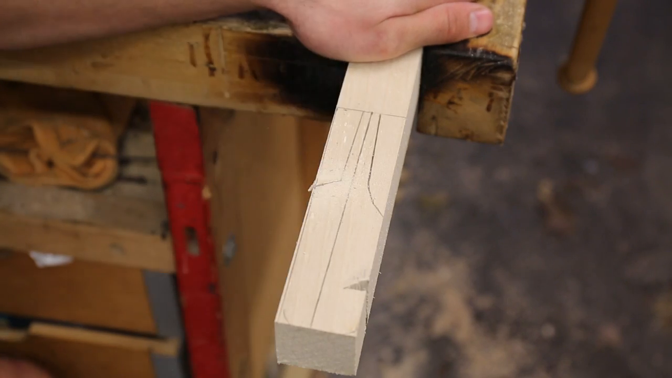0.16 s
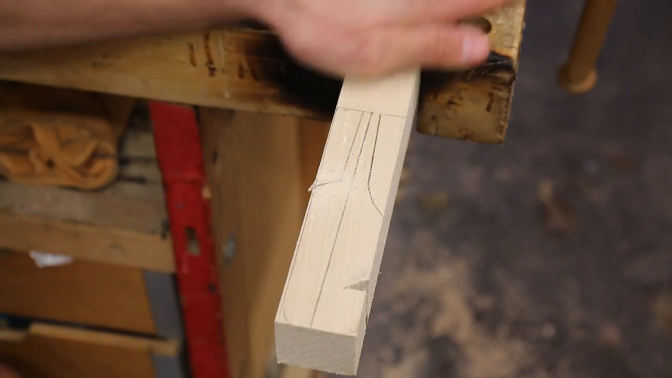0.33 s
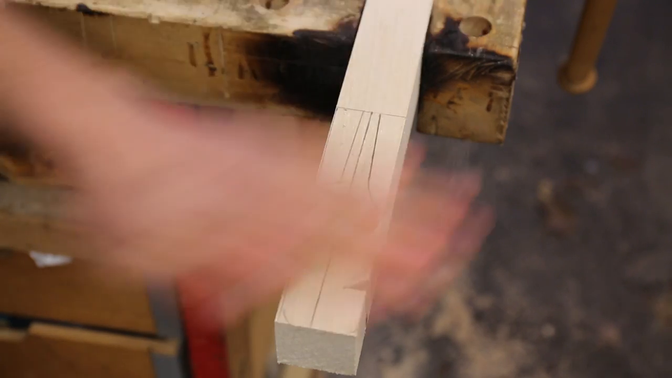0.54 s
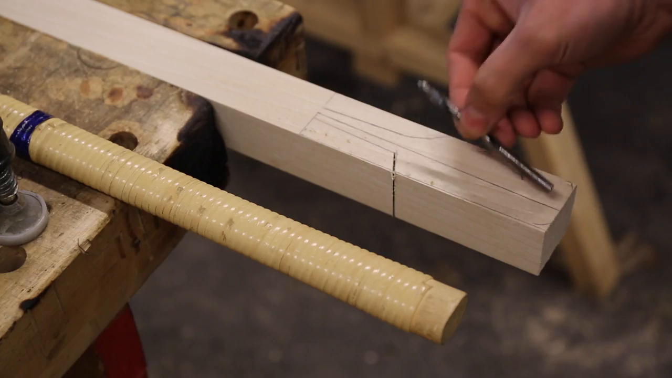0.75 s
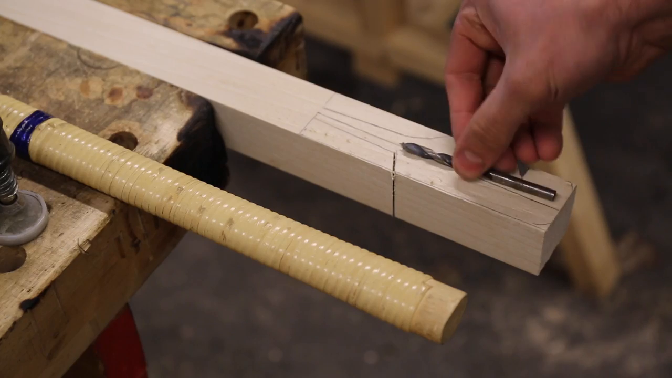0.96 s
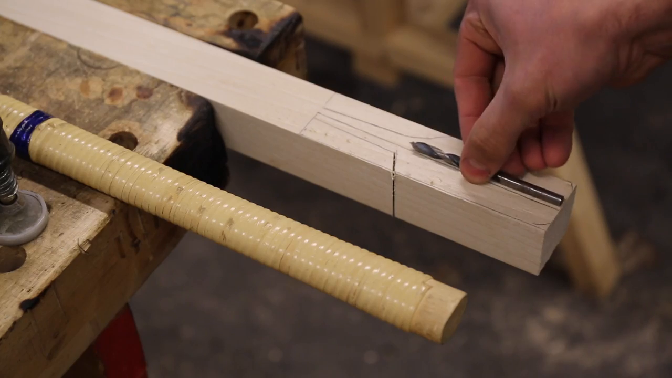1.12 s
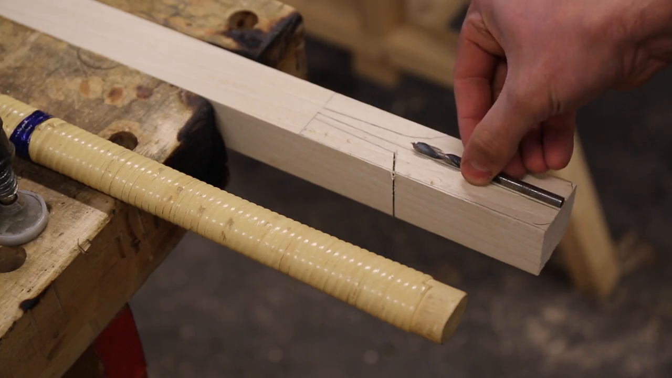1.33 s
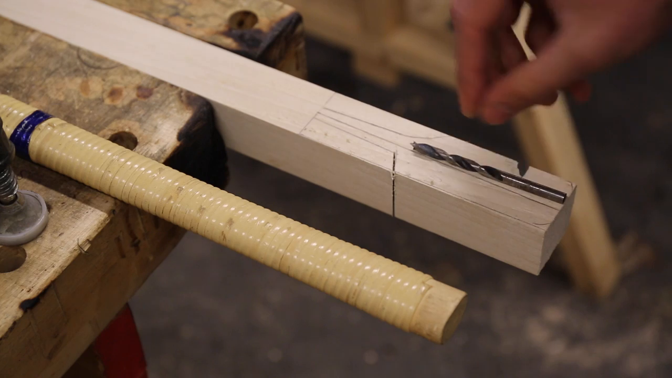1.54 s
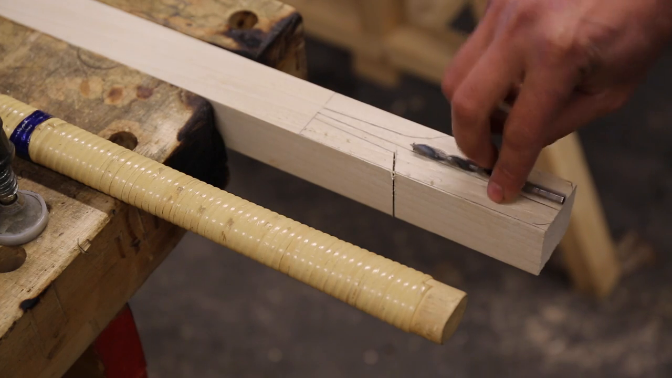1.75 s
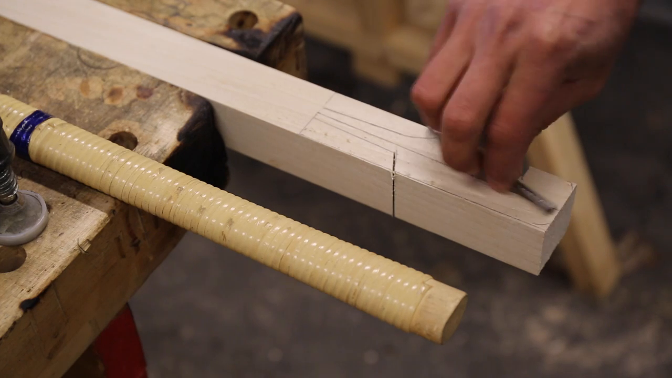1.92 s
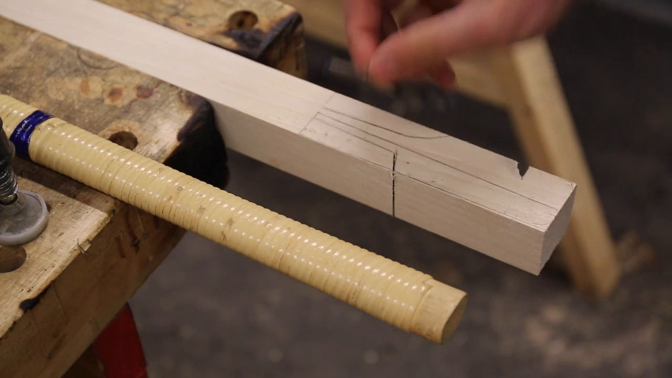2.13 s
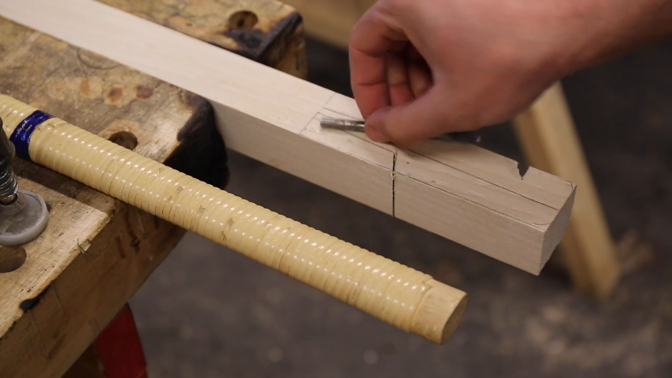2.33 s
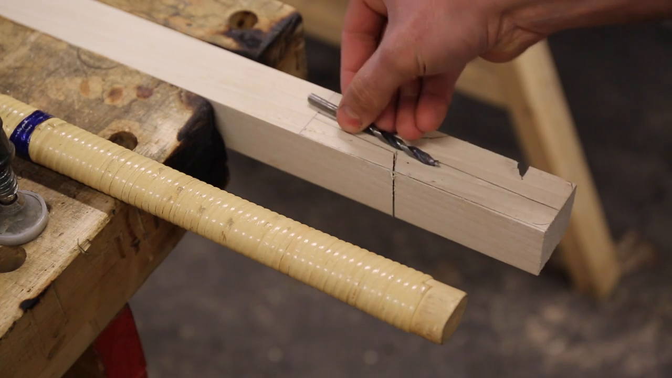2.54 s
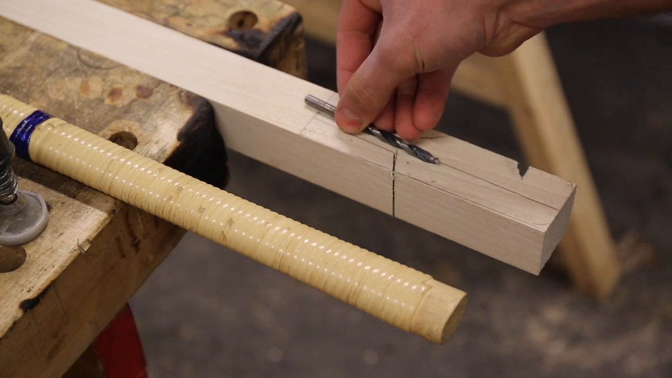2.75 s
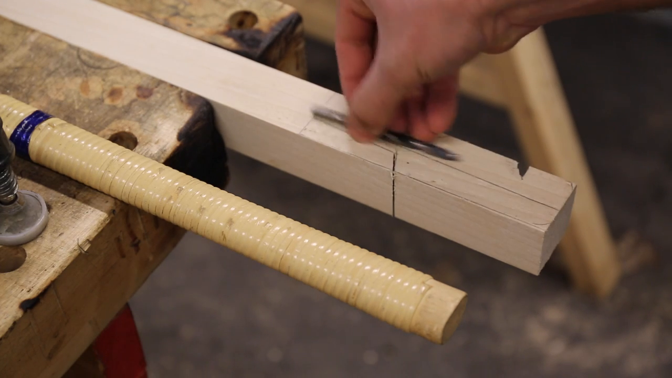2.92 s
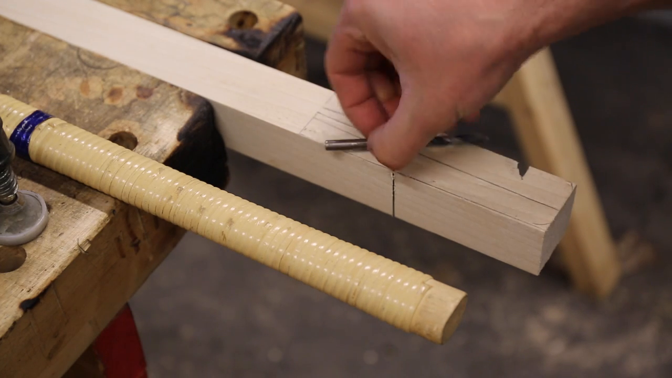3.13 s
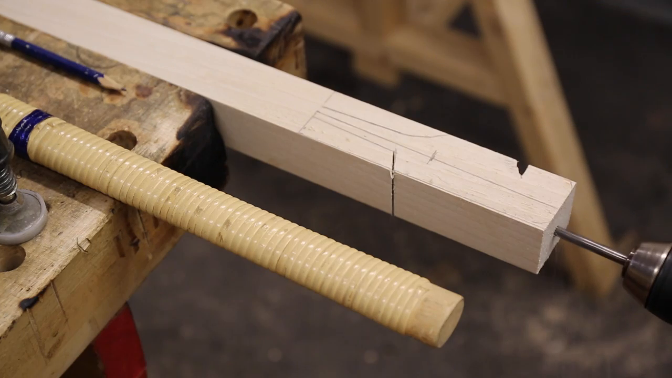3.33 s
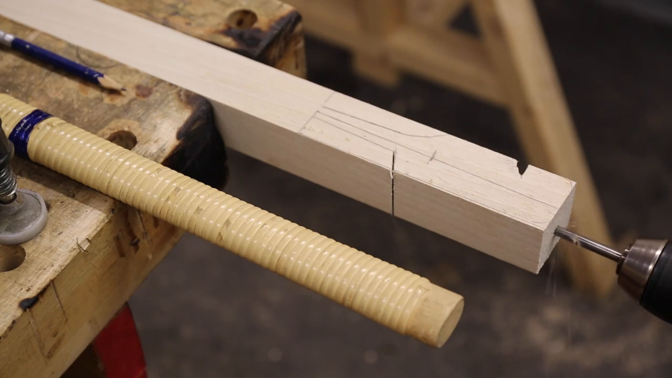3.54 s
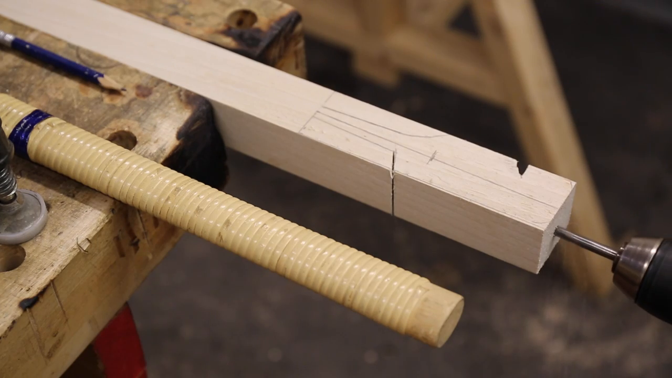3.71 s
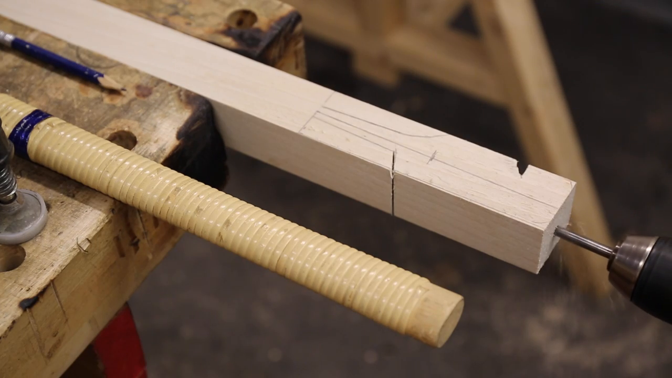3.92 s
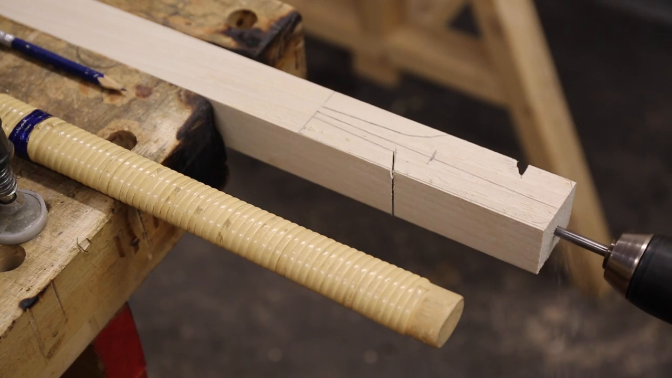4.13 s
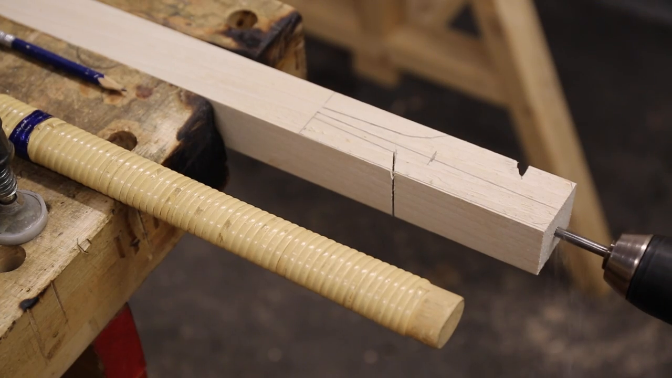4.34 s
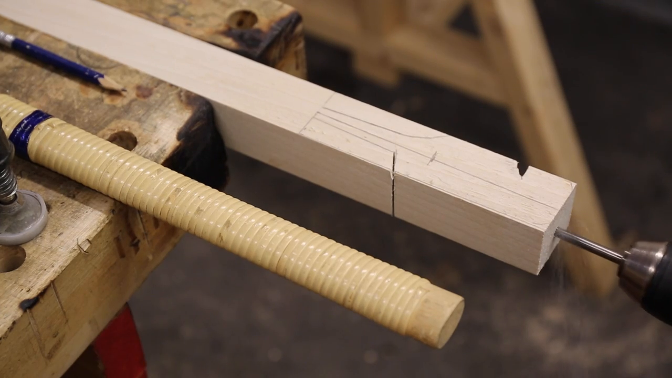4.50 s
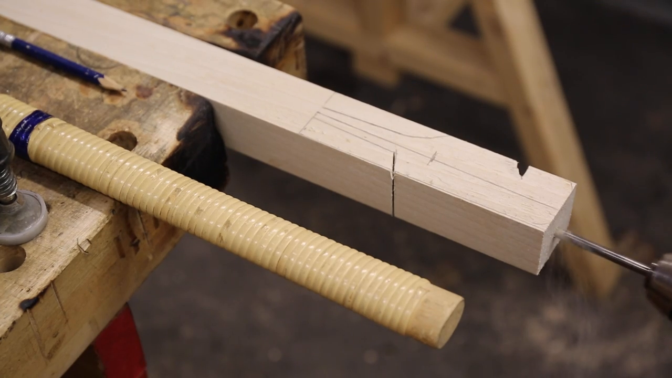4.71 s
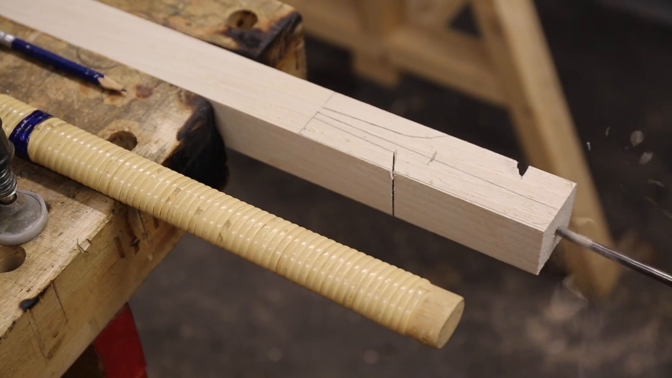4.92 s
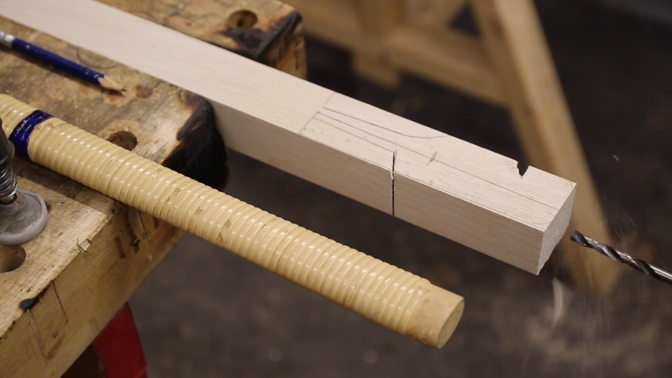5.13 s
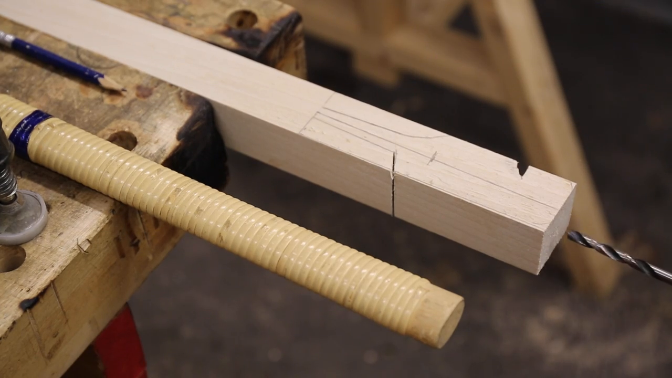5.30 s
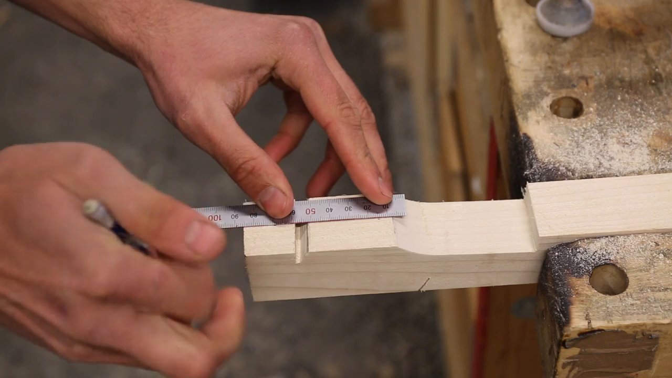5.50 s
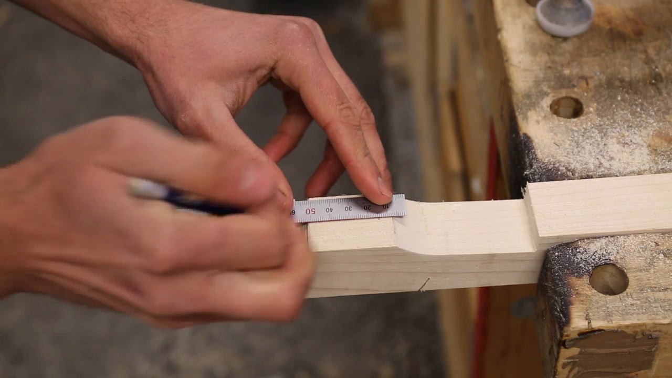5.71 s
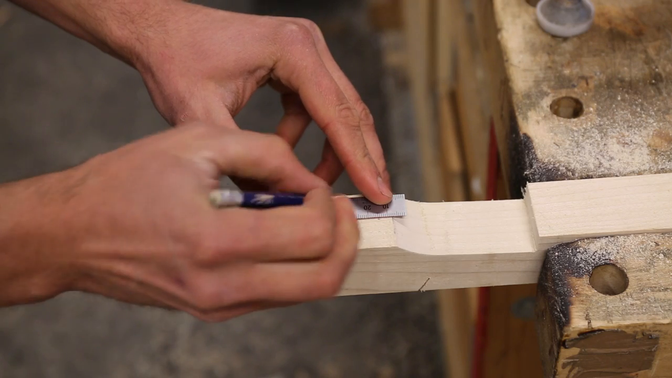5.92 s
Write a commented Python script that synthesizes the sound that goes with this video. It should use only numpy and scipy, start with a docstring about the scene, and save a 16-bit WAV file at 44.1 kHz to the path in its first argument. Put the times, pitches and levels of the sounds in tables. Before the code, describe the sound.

A last rasp of a hand saw leaves a short metallic ring, followed by a brush of skin over wood. Light knocks and scrapes come as a drill bit is laid on a wooden bar and turned. A cordless drill runs for about two seconds, squeaking rhythmically, rising slightly in pitch and stopping with clicks. Faint sounds of a rule and pencil finish. Everything is near the microphone, over dull workshop room tone that shifts abruptly between tasks.

```python
"""A workshop in four sections. First a saw rasps out of its cut, the freed blade rings and a palm wipes
off the dust. Next a steel bit is laid and turned on a clamped wooden bar, knocking and rubbing its modes;
a faint whistle and rustle come from far off. Then a cordless drill bores into the end grain, gears
whining, the bit squealing as it sticks and slips, and brakes with a few clicks. Last, a rule slides
and a pencil scratches a line in the quiet room."""
import sys
import numpy as np
from scipy import signal
from scipy.fft import rfft, irfft
from scipy.io import wavfile

SR = 44100
rng = np.random.default_rng(int(sys.argv[2]) if len(sys.argv) > 2 else 0)


def bounce(signal):
    """Save signal as a 16-bit WAV file at the path given by the first command-line argument."""
    frames = np.transpose(np.atleast_2d(signal))
    limited = np.clip(frames, -1, 1)
    pcm = np.round(limited * 32767).astype(np.int16)
    wavfile.write(sys.argv[1], SR, pcm)


N = 267246
T = np.arange(N) / SR

# drill running curve: time_s, whine_hz, roar_db, whine_db, mesh_db, hum_db
DRILL_CURVE = [(3.253, 5270, -63, -60, -60, -82), (3.285, 5243, -43.5, -48, -48, -74),
               (3.345, 5232, -39, -45, -48, -66), (3.385, 5218, -45.5, -49, -49.5, -70),
               (3.587, 5176, -38, -46, -39, -59), (3.87, 5033, -34.5, -41, -39, -46),
               (4.01, 4996, -39, -47.5, -39, -57), (4.173, 4938, -35.5, -50, -41.5, -47),
               (4.353, 4906, -34, -44, -37, -48), (4.471, 5208, -30.5, -37, -40.5, -52),
               (4.661, 5286, -29, -30.5, -31, -57), (4.789, 5327, -29.5, -29.5, -33.5, -51),
               (4.919, 5520, -30.5, -28, -43, -50), (4.995, 5620, -34.5, -28.5, -59, -54),
               (5.067, 5340, -32.5, -29, -50, -59), (5.1, 5114, -36, -56, -60, -55),
               (5.14, 5160, -39, -80, -80, -68), (5.18, 5140, -50, -90, -90, -84),
               (5.35, 5140, -82, -99, -99, -99)]
# whine, gear mesh, rotor hum: cycles_per_rotor_turn
ROTOR_ORDERS = [15, 10.66, 1]
# modes of the wooden bar in its vice: pitch_hz, level_db, t60_s
BAR_MODES = [(149, -22, .25), (211, -12, 0.14), (284, 0, 0.099), (349.2, -8.5, 0.27), (392, 0, 0.052),
             (610, -11, 0.015), (769, -8, 0.059), (997, -5.5, 0.052), (1164, -2.5, 0.018),
             (1630, -10, 0.024), (2260, -21, 0.019), (3035, -9, 0.011), (3295, -15, 0.02),
             (3520, -6, 0.0052)]
# section boundaries: time_s
SECTION_EDGES_S = [-.1, .705, 3.253, 5.458, 6.1]
BAR_LOW_HZ, BAR_HIGH_HZ = 650, 1400   # split low, middle and high modes


def drill_motor():
    """Rotor orders over the roar of gears and fan and the rumble of the cut."""
    # weak rotor tones: order, level_re_roar_db
    weak_orders = [(5, -16), (13, -16.5)]
    # tones following the whine: order, level_re_whine_db
    whine_orders = [(10, -12.5), (11, -20)]
    seated_s, seating_s, trigger_off_s = 3.47, 0.054, 5.1
    whine_hz, roar_db, whine_db, mesh_db, hum_db, gate = curves(DRILL_CURVE)
    rotor_hz = whine_hz / ROTOR_ORDERS[0] * (1 + 0.001 * drift(35.6))

    def order_tone(order, level_db, waver_db, waver_hz):
        return from_db(level_db + waver_db * drift(waver_hz)) * sine(order * rotor_hz)

    tones = sum(order_tone(k, db, 1.34, 15) for k, db in zip(ROTOR_ORDERS, [whine_db, mesh_db, hum_db]))
    tones += (T < trigger_off_s) * sum(order_tone(k, roar_db + db, 3.3, 5.3) for k, db in weak_orders)
    tones += sum(order_tone(k, whine_db + db, 3.4, 9.8) for k, db in whine_orders)
    tones += from_db(mesh_db - 16) * sine(2.6 * rotor_hz)   # low gear tone
    # the off-centre bit throbs once a turn until seated
    loose = np.clip((seated_s - T) / seating_s, 0, 1)
    throb_db = 6 * loose * np.cos(2 * np.pi * bit_turns())
    # gear and fan spectrum: freq_hz, density_db
    roar_spectrum = [(110, -50), (210, -17.5), (290, -30), (500, -8.5), (648, -15), (888, -10.5),
                     (1130, -7.5), (2650, -1), (3190, -5.5), (3580, -3.5), (6450, -9), (7130, -13),
                     (8240, -16.5), (9370, -23), (11000, -22.5), (14200, -30.5), (15500, -33.5)]
    roar_gain = from_db(roar_db + 0.21 * throb_db + 0.78 * drift(30))
    roar = roar_gain * shaped(grains(15000, spread_db=3.5), roar_spectrum)
    rumble_gain = from_db(1.063 * roar_db - 14 + throb_db)
    rumble = rumble_gain * unit_rms(band(grains(5000, spread_db=6), 184, 523, order=3))
    return gate * (tones + roar + rumble)


def bit_turns():
    """Turns of the geared-down bit since it bit into the wood."""
    gear_ratio, bite_s = 15.6, 3.26
    whine_hz = curves(DRILL_CURVE)[0]
    turns = np.cumsum(whine_hz) / ROTOR_ORDERS[0] / gear_ratio / SR
    return turns - turns[round(bite_s * SR)]


def bit_squeal():
    """Two edges stick and slip on the hole wall, each swelling as it passes the rubbing spot."""
    # rubbing: time_s, first_edge_db, second_edge_db, pitch_hz, spot_angle_turns, spot_width_turns
    rub_curve = [(3.26, -54, -52, 7000, 0.1, 0.068), (3.35, -22.5, -29, 7110, 0.16, 0.074),
                 (3.45, -19.5, -36, 7120, 0.086, .09), (3.53, -20, -31, 7190, 0.061, 0.075),
                 (3.62, -21.5, -16.5, 7050, 0.058, 0.074), (3.72, -25.5, -22.5, 7140, 0.1, 0.096),
                 (3.81, -27.5, -26.5, 7130, 0.048, 0.13), (3.85, -54, -26, 7400, 0.048, 0.16),
                 (3.92, -47, -19, 7320, 0.052, 0.11), (3.99, -39, -26.5, 7300, 0.036, 0.15),
                 (4.09, -41, -21, 7330, .07, 0.12), (4.17, -55, -23.5, 7130, 0.07, .14),
                 (4.31, -54, -22.5, 7160, 0.11, .13), (4.335, -54, -45, 7160, .08, .13)]
    edge_swing_hz, beat_hz, twin_db, between_rubs_db, octave_db = 71, 188, -6.5, -25.5, -16
    first_db, second_db, pitch_hz, angle_turns, width_turns, gate = curves(rub_curve)
    first_turns, second_turns = [(bit_turns() - angle_turns + lead) % 1 - .5 for lead in (.5, 0)]
    swell = np.zeros(N)
    for edge_db, away_turns in [(first_db, first_turns), (second_db, second_turns)]:
        contact = np.exp(-np.abs(away_turns / width_turns) ** 2.8 / 2)
        swell += from_db(edge_db) * (contact + from_db(between_rubs_db))
    swell *= gate * from_db(0.9 * drift(170))
    pitch_hz -= edge_swing_hz * np.cos(2 * np.pi * first_turns)   # second edge sings higher
    phase_rad = 2 * np.pi * np.cumsum(pitch_hz + 35 * drift(250)) / SR
    # the bit rings at two close pitches that beat
    beat_rad = 2 * np.pi * np.cumsum(beat_hz * (1 + 0.24 * drift(30.07))) / SR
    pair = swell * (np.exp(1j * phase_rad) + from_db(twin_db) * np.exp(1j * (phase_rad + beat_rad)))
    octave = pair ** 2 / np.sqrt(np.abs(pair) + 1e-6)
    return np.imag(pair + from_db(octave_db) * octave)


def motor_run_down():
    """The braked motor whines down in a rough tone."""
    # falling whine: time_s, pitch_hz, level_db
    fall_curve = [(5.075, 3047, -60), (5.095, 2570, -45), (5.11, 2260, -44), (5.125, 1760, -56),
                  (5.15, 1190, -56)]
    pitch_hz, level_db, gate = curves(fall_curve)
    return gate * from_db(level_db + 2.15 * drift(80)) * sine(pitch_hz * (1 + 0.023 * drift(151)))


def brake_clicks():
    """Brake and chuck click: a broad snap, a short casing ring and a thin chuck ring."""
    # clicks: start_s, level_db, casing_hz, snap_gain_db, chuck_gain_db
    clicks = [(5.103, -17, 2275, -2, -50), (5.123, -18, 4800, -2, -45), (5.127, -11.5, 3500, -1, -38),
              (5.134, -19, 3530, 0.5, -40), (5.138, -17, 2600, -2, -13), (5.16, -20, 1990, 1, -45),
              (5.164, -8.5, 4750, 0, -43), (5.190, -32, 2500, -13.5, -45), (5.196, -24.5, 2230, 3, -43),
              (5.252, -30, 3360, -5, -35), (5.259, -35, 2600, -10, -27), (5.360, -28, 1420, -13.5, -60),
              (5.424, -33, 6000, -11, -53)]
    # chuck modes: pitch_hz, level_db, t60_s
    chuck_modes = [(9700, -5.5, 0.067), (14000, 8, 0.069)]
    casing_t60_cycles = 15.5
    snaps = bursts(len(clicks), length_samples=300, rise_samples=22, decay_samples=86)
    out = np.zeros(N)
    for (start_s, level_db, casing_hz, snap_db, chuck_db), snap in zip(clicks, snaps):
        hit = impulse(start_s, level_db)
        out += from_db(snap_db) * np.convolve(hit, snap)[:N]
        out += 0.05 * soft_ring(hit, casing_hz, 0.00091, casing_t60_cycles / casing_hz)
        for hz, db, t60_s in chuck_modes:
            out += from_db(chuck_db + db) * soft_ring(hit, hz, 0.00098, t60_s) / 6
    return band(out, 850, 8000)


def bar_knocks():
    """Bit and fingers strike the modes of bar and bit; a soft contact lasts longer and is duller."""
    # knocks: start_s, low_db, middle_db, high_db, contact_cutoff_hz, crack_db, steel_db
    knocks = [(0.931, -19.5, -25, -13, 2170, -48, -93), (0.937, -65, -28.5, -7, 1720, -56, -99),
              (1.0196, -17, -18.5, -4.5, 6030, -33, -44), (1.033, -31, -35, -11.5, 4000, -35, -41),
              (1.039, -28, -43, -24, 4000, -34.5, -36.5), (1.157, -38.5, -39, -35, 5000, -43, -75),
              (1.85, -38.5, -55, -60, 800, -64, -90), (1.864, -37, -54, -60, 800, -60, -90),
              (2.285, -21, -22, -33, 2430, -36.5, -78), (2.296, -27.5, -22.5, -37, 2430, -33.5, -58),
              (2.304, -28, -35, -46, 2000, -35, -92), (2.354, -27, -22.5, -28, 4500, -42, -63)]
    # steel bit modes: pitch_hz, level_db, t60_s
    bit_modes = [(5000, -25, .03), (6170, -19, 0.065), (6934, -2.5, 0.089), (9500, -31, 0.2),
                 (11970, -27, 0.04), (13150, -28, 0.043)]
    low_delay_s = 0.004024   # low modes answer after the contact
    scatters_db = rng.normal(0, 0.98, (len(knocks), len(BAR_MODES) + len(bit_modes)))
    cracks = bursts(len(knocks), length_samples=600, rise_samples=20, decay_samples=184)
    click = signal.unit_impulse(SR // 2)
    out = np.zeros(N)
    for knock, scatter_db, crack in zip(knocks, scatters_db, cracks):
        start_s, low_db, middle_db, high_db, cutoff_hz, crack_db, steel_db = knock
        push = signal.sosfilt(signal.butter(4, cutoff_hz, fs=SR, output="sos"), click)
        late_push = np.roll(push, round(low_delay_s * SR))
        sound = from_db(high_db + 10) * band(push, 820, 4400)   # the blow itself
        for k, (hz, db, t60_s) in enumerate(BAR_MODES):
            blow_db = low_db if hz < BAR_LOW_HZ else middle_db if hz < BAR_HIGH_HZ else high_db
            drive = late_push if hz < BAR_LOW_HZ else push
            sound += (-1) ** k * from_db(db + blow_db + scatter_db[k]) * ring(drive, hz, t60_s)
        for (hz, db, t60_s), offset_db in zip(bit_modes, scatter_db[::-1]):
            sound += from_db(db + steel_db + offset_db) * soft_ring(click, hz, 0.01, t60_s) / 40
        sound[:len(crack)] += from_db(crack_db) * band(crack, 2500, 10900)
        at = round(start_s * SR)
        out[at:at + len(sound)] += sound
    return out


def bar_rubbing():
    """Dense catches of teeth, skin or steel shake the low modes, rasp the high ones and swish above."""
    # strokes of saw, palm, bit, rule:
    # peak_s, rise_s_per_20db, fall_s_per_20db, body_db, rasp_db, swish_db, singing_db
    strokes = [(0.037, 0.32, 0.061, -22.5, -26.5, -37, -25), (0.064, 0.048, 0.12, -54, -18.5, -31, -36),
               (0.151, 0.11, 0.041, -26, -21.5, -25, -42), (0.19, 0.033, 0.25, -40.5, -42, -52, -66),
               (0.318, 0.013, 0.014, -49, -27, -34.5, -65), (0.504, 0.19, 1, -53.5, -30, -41, -54),
               (0.68, 0.17, 0.059, -33, -40, -41.5, -36.5), (1.849, 0.011, 0.043, -41, -54, -58, -52),
               (1.905, 0.047, 0.26, -45, -50, -60, -56), (2.331, 0.012, 0.014, -34, -60, -64, -62),
               (2.359, 0.023, 0.021, -32, -47, -54, -41), (2.422, 0.051, 0.055, -42, -46, -53.5, -43.5),
               (2.516, 0.12, 0.29, -47.5, -43, -57, -48.5), (3.018, 0.084, 0.083, -60, -40, -53.5, -51),
               (3.09, 0.18, 0.11, -54, -68, -63, -65), (3.22, 0.29, 0.066, -37.5, -66, -61, -60),
               (5.47, 0.068, .12, -46.5, -50, -62, -72), (5.56, 0.11, 0.22, -60, -65, -67, -87),
               (5.72, 0.34, 0.67, -59, -72, -76, -86), (5.9, 0.091, 0.21, -66, -66, -61, -90)]
    # midrange friction spectrum: freq_hz, density_db
    rasp_spectrum = [(410, -38), (700, -14.5), (926, -3), (1650, 1.5), (1870, 0), (3170, 4.5), (4500, -7),
                     (5850, -49), (9900, -120)]
    # treble friction spectrum: freq_hz, density_db
    swish_spectrum = [(2350, -16.5), (4000, -8), (5330, -2), (6910, -4), (10300, -6), (15800, -17)]
    singing_hz, singing_t60_s = 1601, 0.037
    catches = grains(8000, spread_db=7)
    low_modes = sum(from_db(db) * ring(catches, hz, 0.5 * t60_s)
                    for hz, db, t60_s in BAR_MODES if hz < BAR_LOW_HZ)
    high_modes = sum(from_db(db) * ring(catches, hz, 0.45 * t60_s)
                     for hz, db, t60_s in BAR_MODES if hz > BAR_LOW_HZ)
    bench = from_db(-19.5) * unit_rms(band(catches, 85, 150))
    body = unit_rms(low_modes) + bench
    rasp = 0.53 * shaped(grains(8000, spread_db=3.5), rasp_spectrum) + 0.17 * unit_rms(high_modes)
    swish = shaped(grains(15000, spread_db=3.5), swish_spectrum)
    singing = unit_rms(soft_ring(catches, singing_hz, singing_t60_s, singing_t60_s))
    uneven = from_db(0.6 * drift(28))
    section = np.searchsorted(SECTION_EDGES_S, T, "right")
    gains = np.zeros((4, N))
    for peak_s, rise_s, fall_s, *layers_db in strokes:
        inside = section == np.searchsorted(SECTION_EDGES_S, peak_s, "right")
        since_s = T[inside] - peak_s
        envelope = from_db(-20 * np.maximum(-since_s / rise_s, since_s / fall_s))
        gains[:, inside] += from_db(layers_db)[:, None] * envelope
    return np.sum(gains * [body, uneven * rasp, uneven * swish, singing], axis=0)


def saw_blade():
    """Jolted as it comes free, the blade rings out, wavering as it wobbles."""
    # blade modes: pitch_hz, level_db, t60_s
    blade_modes = [(818, -46.5, 1), (2270, -40, 0.76), (3280, -45, .5), (3570, -49, 0.48),
                   (4260, -44, 0.17), (5120, -48, 0.36), (5600, -48, 0.25), (7330, -52, .5)]
    jolt = impulse(start_s=0.2, level_db=0)
    return sum(from_db(db + 2.64 * drift(54)) * soft_ring(jolt, hz, 0.011, t60_s) / 90
               for hz, db, t60_s in blade_modes)


def pencil():
    """The lead catches along the rule: a dry scratch in narrow bands."""
    # pencil stroke: time_s, level_db
    line_curve = [(5.6, -69), (5.644, -65), (5.718, -54), (5.88, -64), (5.95, -69)]
    # scratch bands: centre_hz, level_db, t60_s
    lead_bands = [(2960, -1.5, 0.0098), (3200, -2, 0.011), (3380, -6.5, 0.018)]
    level_db, gate = curves(line_curve)
    catches = grains(5000, spread_db=0)
    scratch = sum(from_db(db + 2.3 * drift(15)) * soft_ring(catches, hz, t60_s, t60_s)
                  for hz, db, t60_s in lead_bands)
    return gate * from_db(level_db) * unit_rms(scratch)


def far_whistle():
    """A faint, slightly rough gliding tone."""
    # whistle: time_s, pitch_hz, level_db
    whistle_curve = [(1.52, 2050, -69), (1.592, 2175, -59), (1.664, 2120, -60), (1.672, 2050, -55),
                     (1.784, 2040, -69), (1.8, 2085, -64)]
    pitch_hz, level_db, gate = curves(whistle_curve)
    return gate * from_db(level_db + 2.9 * drift(37)) * sine(pitch_hz + 15 * drift(40))


def far_rustle():
    """Narrow noise bands that come and go."""
    # one curve per rustle: time_s, level_db
    rustle_curves = [
        [(0.705, -62), (1.29, -64), (1.49, -61), (2.08, -62.5), (2.28, -53.5), (2.9, -58), (3.253, -73)],
        [(5.458, -72), (5.61, -62), (5.75, -74), (6.06, -67)],
    ]
    white = rng.standard_normal(N)
    patches = unit_rms(sum(from_db(6.5 * drift(4)) * ring(white, hz, t60_s=.02)
                           for hz in np.linspace(2300, 4200, 12)))
    return patches * sum(gate * from_db(level_db) for level_db, gate in map(curves, rustle_curves))


def shop_echo(x):
    """Dense echo tail; the treble dies sooner."""
    low_t60_s, high_t60_s, split_hz, onset_s = 0.45, 0.11, 2200, 0.006
    t = np.arange(SR // 2) / SR
    white = rng.standard_normal(len(t))
    low = band(white, 100, split_hz, order=1)
    tail = low * from_db(-60 * t / low_t60_s) + (white - low) * from_db(-60 * t / high_t60_s)
    tail *= np.clip(t / onset_s, 0, 1)
    return signal.fftconvolve(x, tail / np.sqrt(np.sum(tail ** 2)))[:N]


def room_tone():
    """Dull, nearly steady noise."""
    # room spectrum: freq_hz, density_db
    room_spectrum = [(15, -32), (25, -4.5), (153, 2.5), (206, 6), (231, -1.5), (298, 4), (366, -4.5),
                     (439, 1), (695, -0.5), (958, 4), (2140, -11), (3790, -12.5), (6000, -41), (7800, -25),
                     (13200, -120)]
    return shaped(rng.standard_normal(N), room_spectrum) * from_db(0.24 * drift(18))


def amplifier_hiss():
    """Mid and side hiss; the side also carries low flicker noise."""
    mid, side = [unit_rms(band(rng.standard_normal(N), 4300, 21000)) for _ in range(2)]
    flicker = unit_rms(band(rng.standard_normal(N), 22, 900, order=1))
    return mid, side + from_db(-12) * flicker


def from_db(db):
    """Level to gain."""
    return 10 ** (np.asarray(db) / 20)


def unit_rms(x):
    """Scale to rms 1."""
    return x / np.sqrt(np.mean(x ** 2) + 1e-20)


def curves(rows):
    """Columns interpolated over time, then a gate open while the table lasts."""
    time_s, *columns = np.transpose(rows)
    gate = np.clip(np.minimum(T - time_s[0], time_s[-1] - T) / .004, 0, 1)
    return [np.interp(T, time_s, column) for column in columns] + [gate]


def band(x, low_hz, high_hz, order=2):
    """Band-pass."""
    edges_hz = [low_hz, min(high_hz, .45 * SR)]
    return signal.sosfilt(signal.butter(order, edges_hz, "band", fs=SR, output="sos"), x)


def drift(rate_hz):
    """Smooth random wander; rms 1."""
    pole = np.exp(-2 * np.pi * rate_hz / SR)
    return unit_rms(signal.lfilter([1], [1, -2 * pole, pole * pole], rng.standard_normal(N + SR))[SR:])


def ring(x, hz, t60_s):
    """Resonator: a unit click rings a decaying tone of height about 2."""
    radius, step_rad = from_db(-60 / (t60_s * SR)), 2 * np.pi * hz / SR
    return signal.lfilter([1, 0, -1], [1, -2 * radius * np.cos(step_rad), radius ** 2], x + 1e-18)


def soft_ring(x, hz, onset_t60_s, t60_s):
    """Two resonators in series: swells, then decays; gain not normalised."""
    return ring(ring(x, hz, onset_t60_s), hz, t60_s)


def shaped(x, spectrum):
    """Colour by (freq_hz, density_db) points; rms 1."""
    bins_hz = np.fft.rfftfreq(N, 1 / SR) + 1
    freq_hz, density_db = np.transpose(spectrum)
    gain = from_db(np.interp(np.log(bins_hz), np.log(freq_hz), density_db))
    return unit_rms(irfft(rfft(x) * gain, N))


def grains(per_s, spread_db):
    """Random clicks of uneven size and sign; rms 1."""
    sizes = from_db(spread_db * np.minimum(rng.exponential(1, N), 4)) * rng.choice([-1, 1], N)
    return unit_rms(sizes * (rng.random(N) < per_s / SR))


def bursts(count, length_samples, rise_samples, decay_samples):
    """Short decaying noise bursts, one per row."""
    n = np.arange(length_samples)
    envelope = np.exp(-n / decay_samples) * np.minimum(n / rise_samples, 1)
    return rng.standard_normal((count, length_samples)) * envelope


def impulse(start_s, level_db):
    """One click."""
    return from_db(level_db) * signal.unit_impulse(N, round(start_s * SR))


def sine(hz):
    """Gliding tone; rms 1."""
    return np.sqrt(2) * np.sin(2 * np.pi * np.cumsum(hz) / SR + rng.uniform(0, 2 * np.pi))


def scene():
    """Stereo mix; each section has its own echo and background and ends abruptly."""
    # background per section: room_db, mid_hiss_db, side_hiss_db
    backgrounds = [(-43, -68, -110), (-49, -62, -66.5), (-72, -76.5, -110), (-55.5, -62.5, -60.5)]
    echo_db, fade_s, bass_cut_hz = -14, 0.003, 70
    sources = bar_rubbing() + bar_knocks() + saw_blade()
    sources += drill_motor() + motor_run_down() + bit_squeal() + brake_clicks()
    sources += pencil() + far_whistle() + far_rustle()
    # high-pass trims the deep bass of the sources, not the room tone
    sources = signal.sosfilt(signal.butter(2, bass_cut_hz, "high", fs=SR, output="sos"), sources)
    room = room_tone()
    mid_hiss, side_hiss = amplifier_hiss()
    out = np.zeros((2, N))
    for k, (room_db, mid_db, side_db) in enumerate(backgrounds):
        start_s, end_s = SECTION_EDGES_S[k:k + 2]
        gate = np.clip(np.minimum(T - start_s, end_s - T) / fade_s, 0, 1)
        echo = from_db(echo_db) * shop_echo(gate * sources)
        out += gate * (sources + echo + from_db(room_db) * room + from_db(mid_db) * mid_hiss)
        out += gate * from_db(side_db) * side_hiss * [[1], [-1]]
    return out


def record(dry):
    """Clip at full scale, then low-pass."""
    cutoff_hz = 15800
    return signal.sosfilt(signal.ellip(10, .3, 70, cutoff_hz, fs=SR, output="sos"), np.clip(dry, -1, 1))


dry = scene()
out = record(dry)
bounce(out)
```